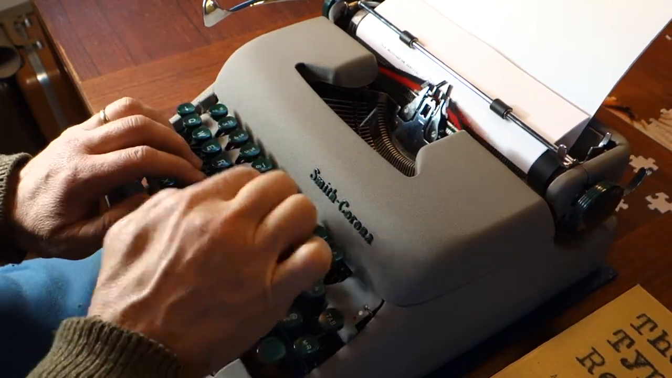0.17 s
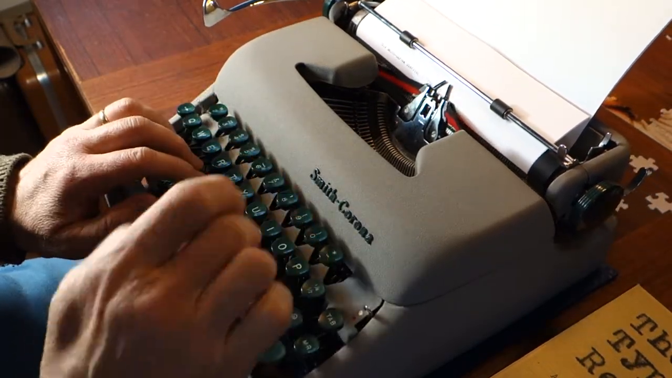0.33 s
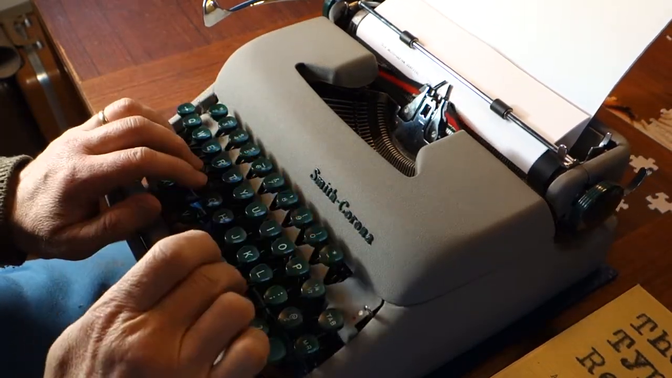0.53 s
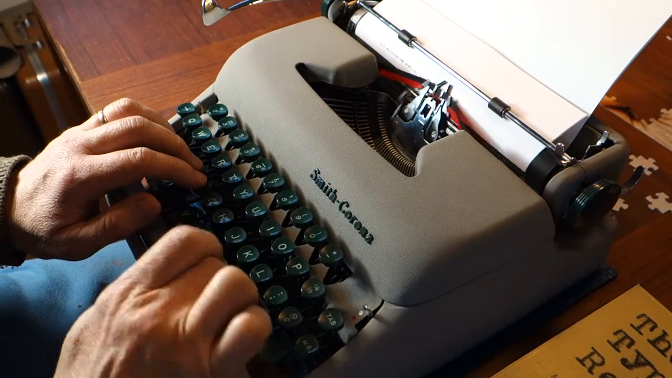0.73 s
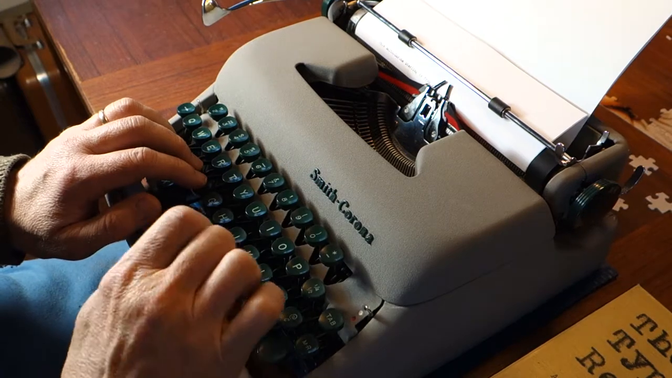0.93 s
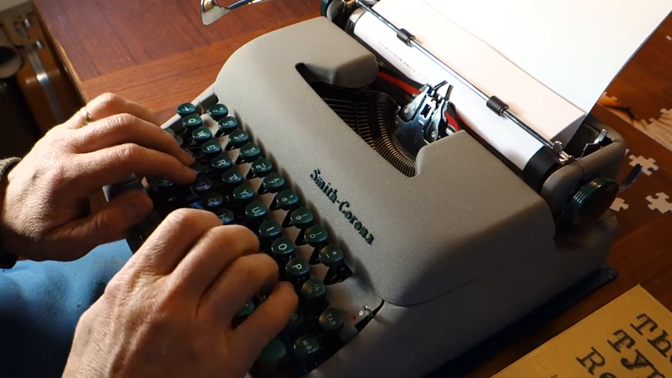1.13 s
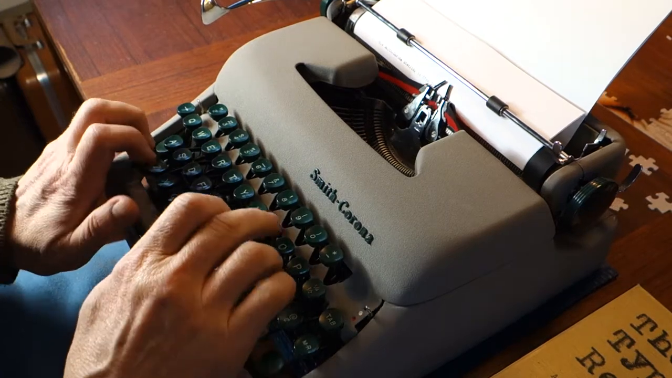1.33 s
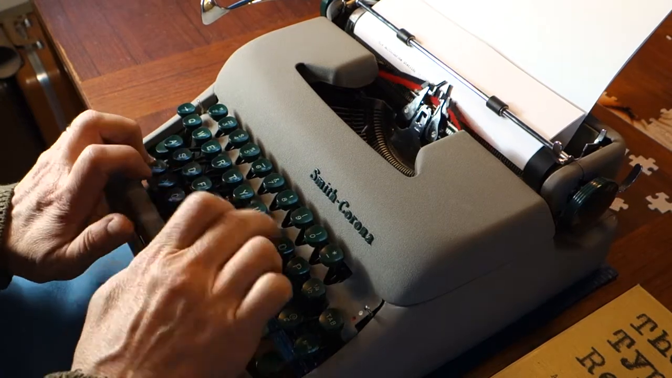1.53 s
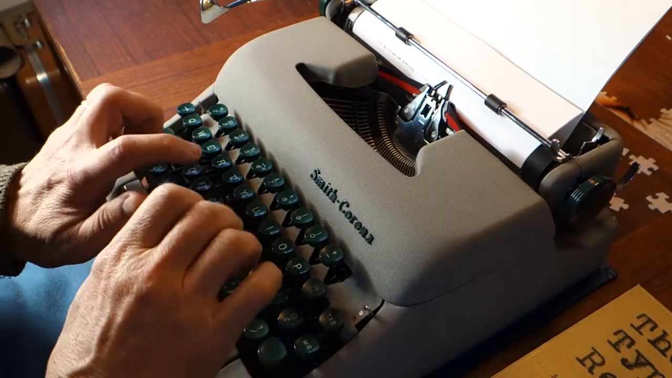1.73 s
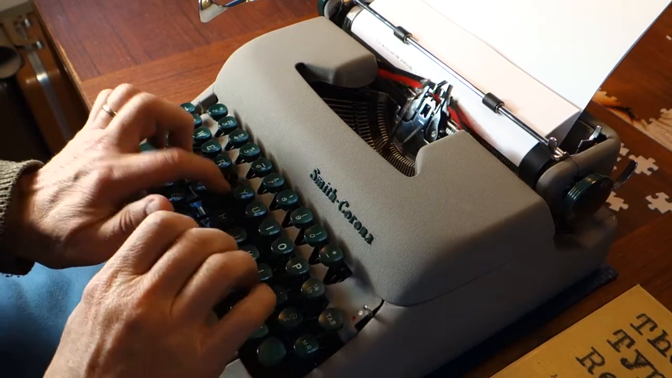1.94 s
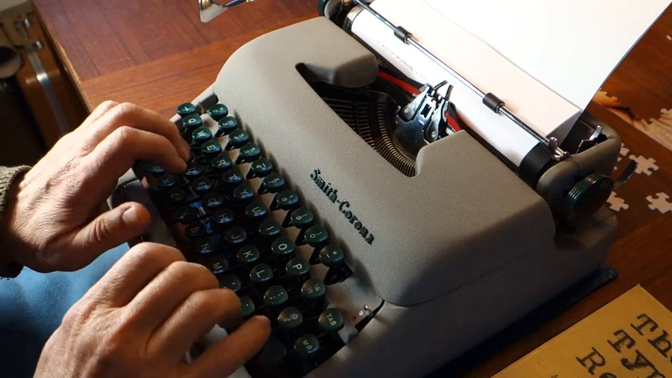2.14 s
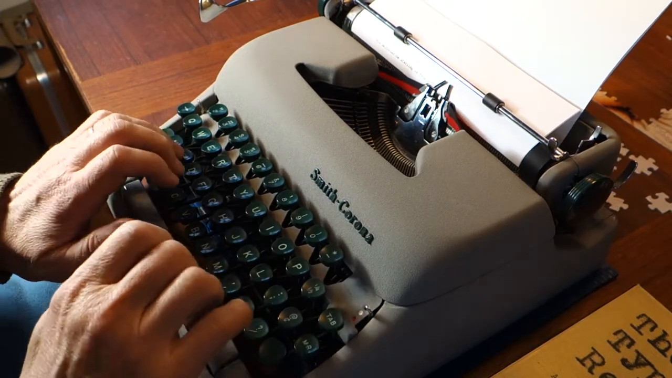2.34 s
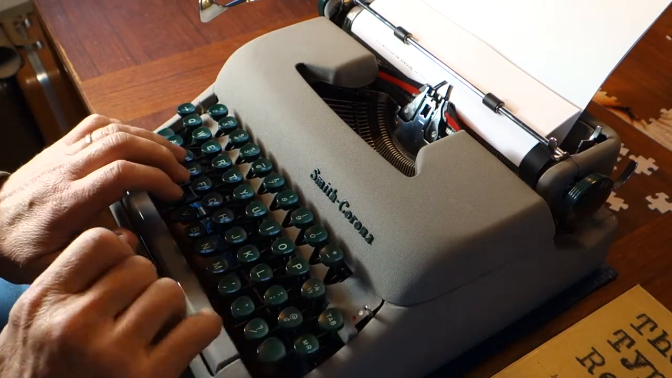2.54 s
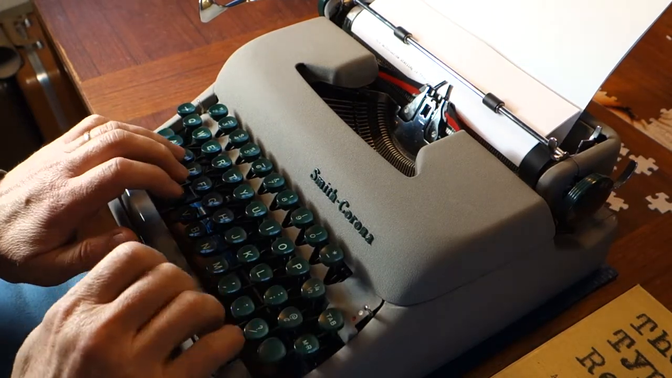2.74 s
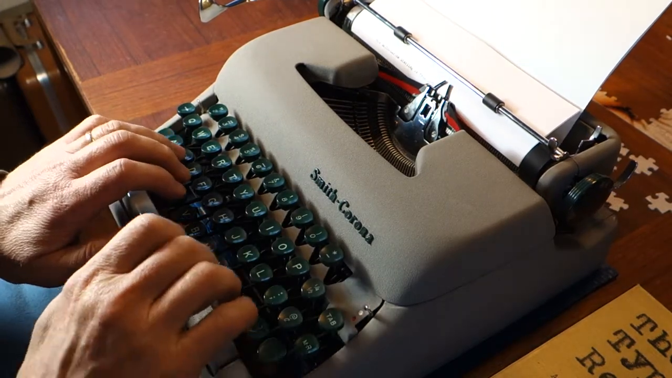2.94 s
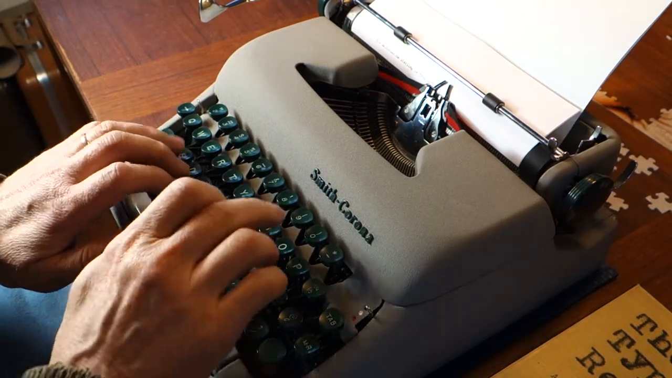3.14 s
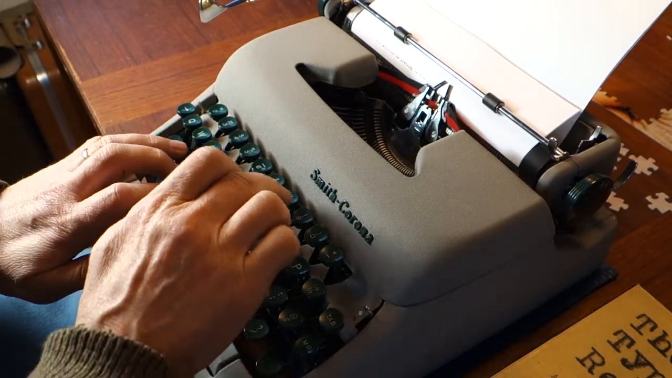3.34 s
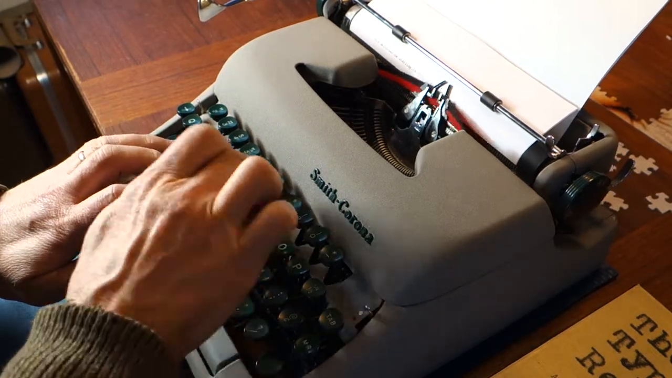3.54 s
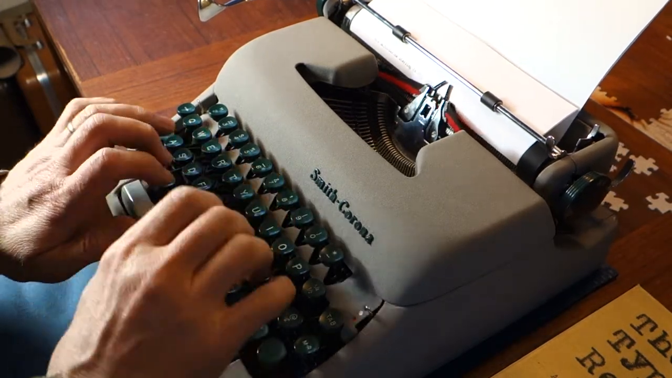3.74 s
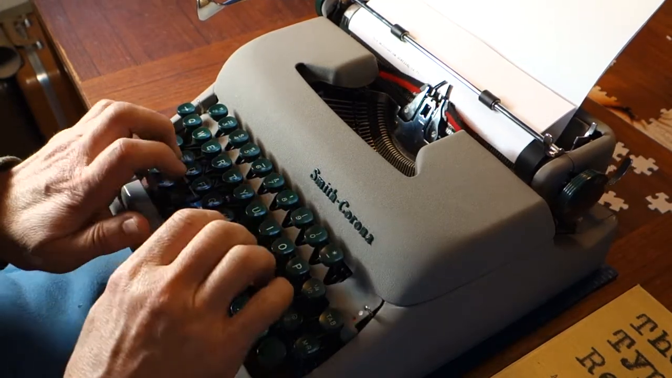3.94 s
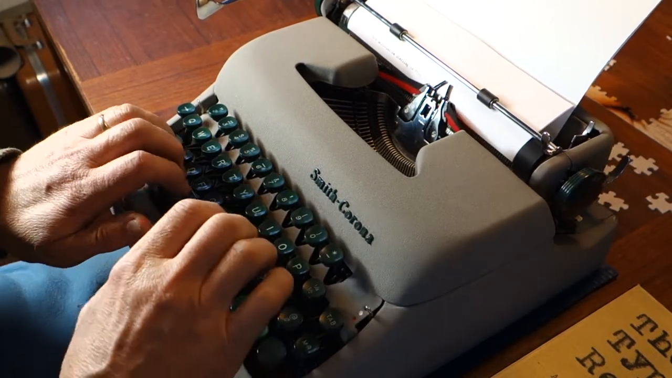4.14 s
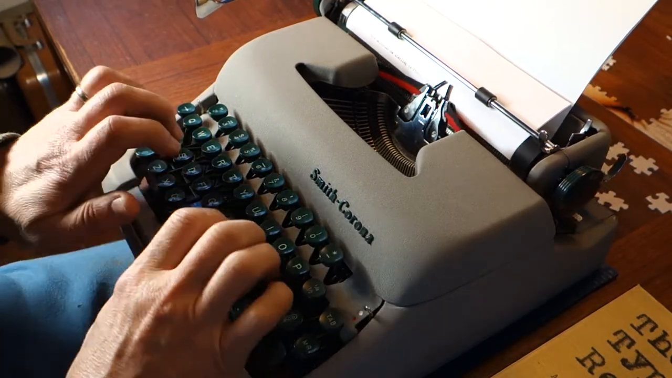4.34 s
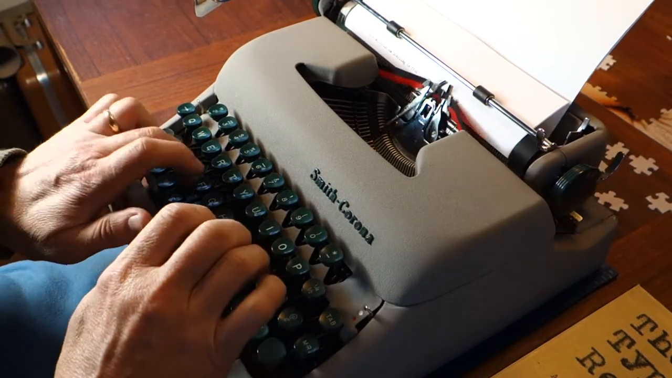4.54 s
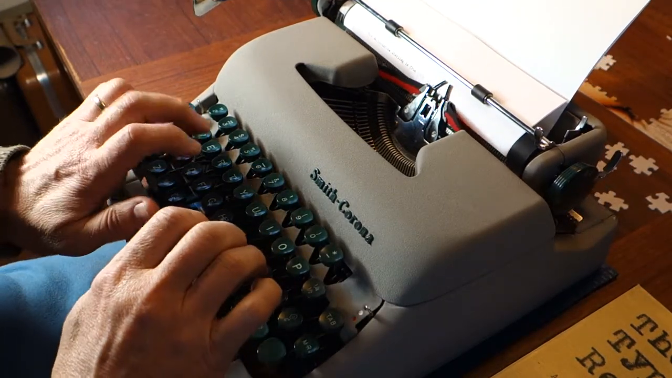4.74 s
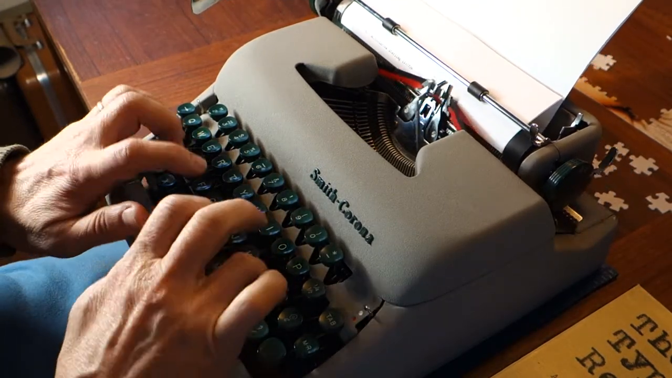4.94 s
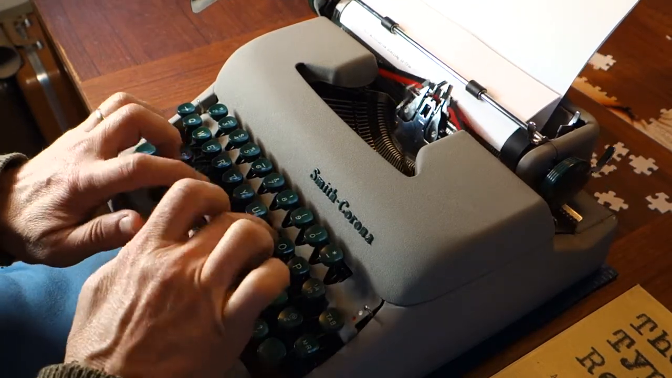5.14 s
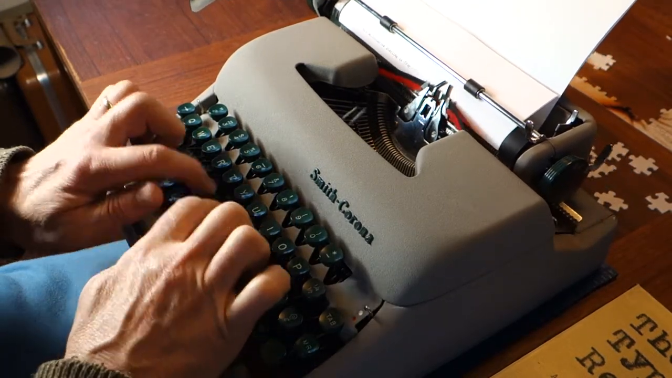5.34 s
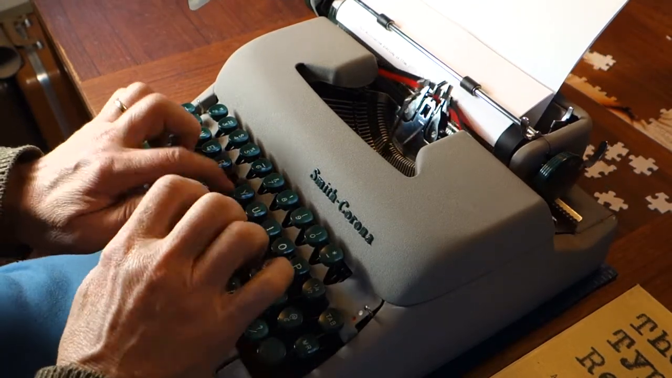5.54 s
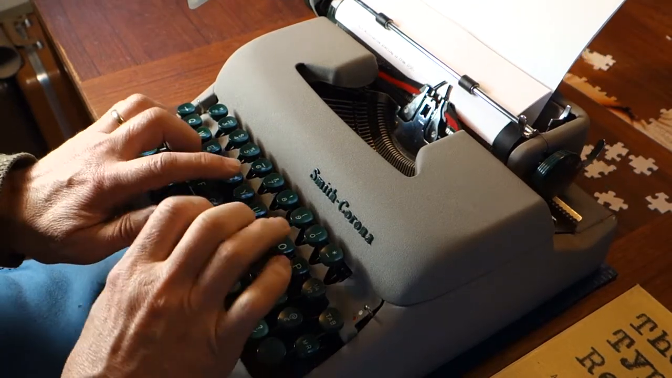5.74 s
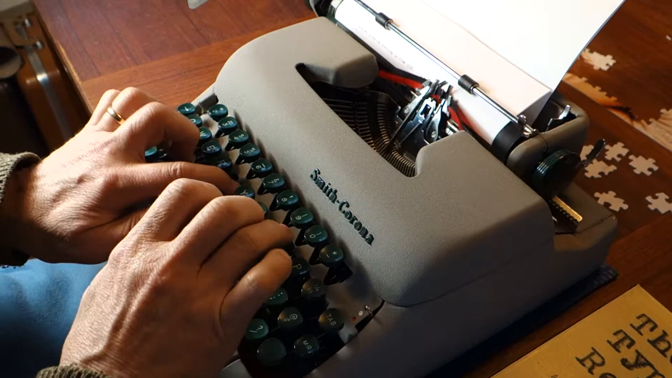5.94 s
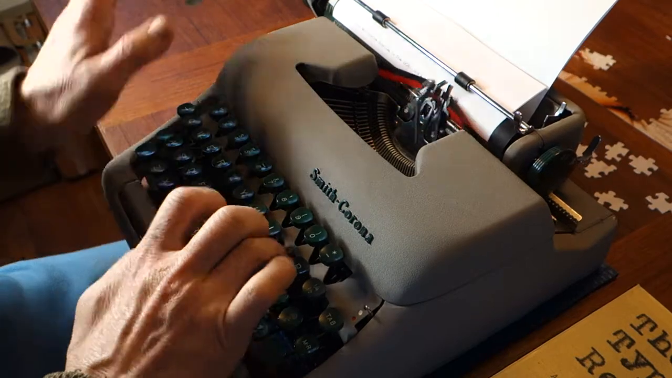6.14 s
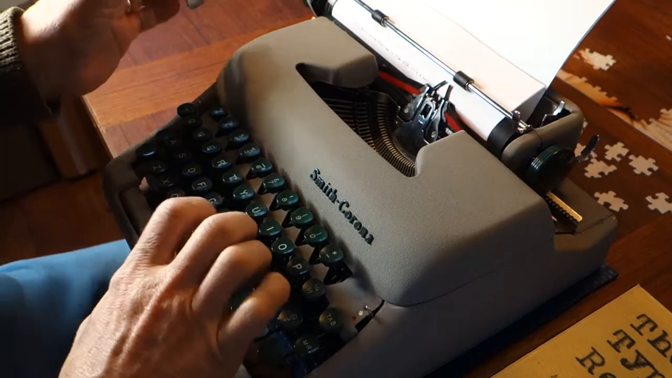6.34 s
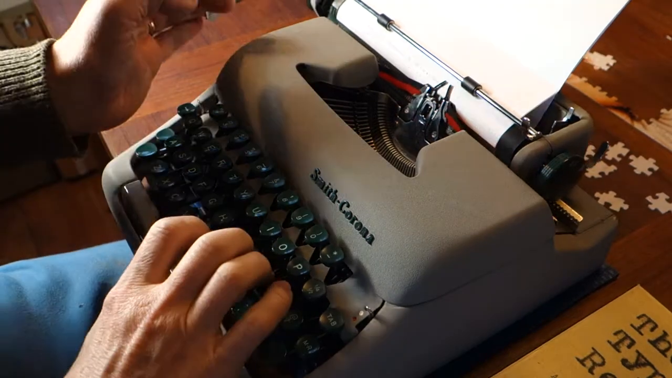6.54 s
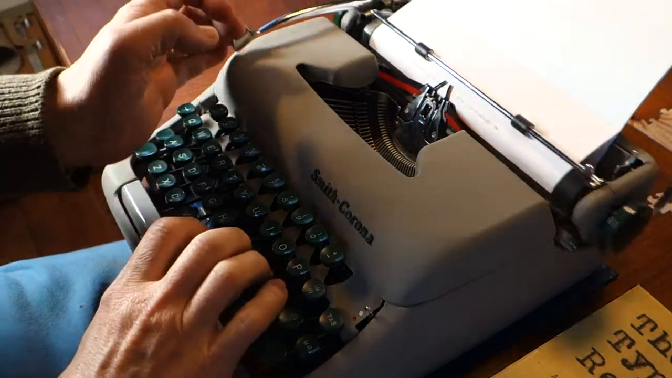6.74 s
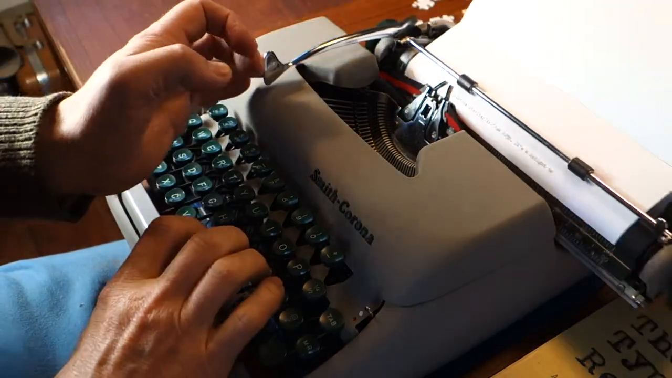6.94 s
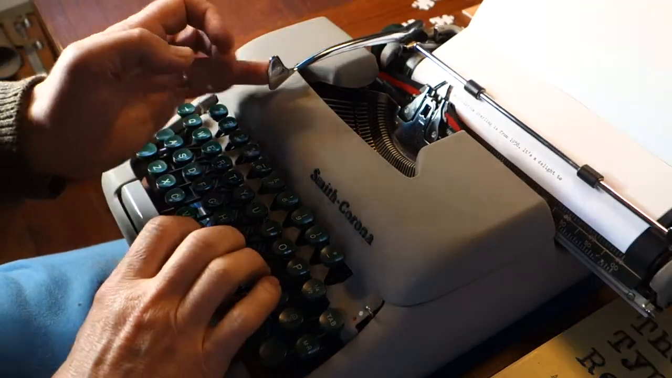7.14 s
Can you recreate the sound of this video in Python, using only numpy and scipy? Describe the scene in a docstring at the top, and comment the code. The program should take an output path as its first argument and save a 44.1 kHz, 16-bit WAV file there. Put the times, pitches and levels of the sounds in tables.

```python
"""Fast typing clatters on a small manual typewriter on a wooden table in a quiet room, then its carriage returns.
Showers of tiny clicks ring metal parts to make the rattles, and single clicks make the harder knocks.
Each letter ends in a crack and thud on the rubber platen, echoed by near surfaces; noise shakes case and table.
The carriage is a grainy rumble in surges; fading noise gives the room's echo and steady noise its quiet hiss."""
import sys
import numpy as np
from scipy import signal
from scipy.fft import rfft, irfft
from scipy.io import wavfile

SR = 44100
rng = np.random.default_rng(int(sys.argv[2]) if len(sys.argv) > 2 else 0)


def inscribe(sig):
    """Save sig as 16-bit PCM at rate SR to the path in sys.argv[1].

    A 1-D sig is mono; a 2-D sig holds one channel per row.
    Samples are clipped to [-1, 1] before scaling.
    """
    pcm = np.round(np.clip(np.atleast_2d(sig).T, -1, 1) * 32767)
    wavfile.write(sys.argv[1], SR, pcm.astype(np.int16))


N = 321930   # length in samples

# Letter keys. Each row: time the slug hits the platen in seconds, crack level in dB, thud level in dB,
# how long before that the key goes down in ms, press level in dB,
# how long after it the typebar falls back in ms, fall level in dB. Levels compare one key with another.
LETTERS = [(0.1505, -5, -15, 36.7, -32, 74, -26.5), (0.716, -13.5, -8, 37.4, -30.5, 98.4, -26.5),
           (1.589, -5, -12, 35.8, -27, 96.5, -23.5), (1.92, -2, -7.5, 37.4, -25, 106.6, -22.5),
           (3.491, -6.5, -16.5, 36.7, -30, 91, -25.5), (3.8755, -5, -7.5, 40.9, -26.5, 101, -25),
           (4.2412, -4.5, -10, 50, -36.5, 126.5, -24.5), (4.5635, -6.5, -10, 41.6, -27, 91, -26),
           (4.8352, -6, -10.5, 38.3, -27.5, 56, -40), (4.9304, -7, -8, 17, -34, 149, -24.5),
           (5.1179, -6.5, -8.5, 67, -29.5, 105.8, -24.5), (5.3059, -5.5, -9, 41.6, -28, 64, -28),
           (5.396, -7.5, -7.5, 23, -32.5, 92, -20), (5.5254, -4.5, -8.5, 39, -34.5, 106, -23),
           (5.9604, -4, -7, 37.2, -28, 108, -23.5), (6.1371, -2, -6, 42, -29, 112, -25.5)]
# Shift key. Each row: time the type basket lands in seconds, landing level in dB,
# how long before that the slack is taken up in ms, slack level in dB,
# time the key is let go in seconds, let-go level in dB. Levels are relative.
SHIFTS = [(1.3628, -15, 37, -41, 1.7444, -21.5), (3.2272, -17, 12.5, -33.5, 3.692, -21)]
# Tones of the table top. Each row: pitch in Hz, relative level in dB, time to fade by 60 dB in seconds.
TABLE_MODES = [(71.6, -10.5, 0.12), (146.5, -4.5, 0.22), (173, -7, 0.035), (277, -9, 0.012)]

SPREAD_DB = 2   # typical random change in each tone's strength from one part to the next


def from_db(db):
    """Turn a level in dB into a gain."""
    return 10 ** (np.asarray(db) / 20)


def at_hz(points, hz):
    """Read a table between its points, with frequency spaced as the ear hears it (logarithmic)."""
    points = np.array(points)
    return np.interp(np.log(hz), np.log(points[:, 0]), points[:, 1])


def band(x, low_hz, high_hz):
    """Gently keep the sound between two frequencies."""
    sos = signal.butter(1, [low_hz, high_hz], "band", fs=SR, output="sos")
    return signal.sosfilt(sos, x + 1e-18)   # the tiny offset avoids slow arithmetic in silence


def ring(x, modes, changes=(0,), vary_db=0):
    """Let a signal strike fading tones side by side; at each change time every tone gets a new strength."""
    out = 0
    part = np.searchsorted(np.sort(changes), np.arange(N) / SR)
    strengths = from_db(vary_db * rng.standard_normal((len(changes) + 1, len(modes))))
    for k, (hz, level_db, t60) in enumerate(modes):
        r = from_db(-60 / (t60 * SR))   # fading per sample
        w = 2 * np.pi * hz / SR         # turn per sample
        gain = (-1) ** k * from_db(level_db) * np.sqrt(1 - r * r)   # neighbours have opposite signs
        push = x * strengths[part, k] + 1e-18
        out = out + signal.lfilter([0, gain * np.sin(w)], [1, -2 * r * np.cos(w), r * r], push)
    return out


def stereo_noise(size, spectrum):
    """Coloured noise whose two channels are alike in the bass and differ in the treble; rms 1."""
    # How alike left and right are. Each row: frequency in Hz, likeness (1 same, 0 unrelated, -1 opposite).
    likeness = [(30, 1), (200, 0.92), (500, 0.92), (2000, 0.37), (4000, 0.0042), (8000, -0.47)]
    hz = np.maximum(np.fft.rfftfreq(size, 1 / SR), 10)
    mid, side = rfft(rng.standard_normal((2, size))) * from_db(at_hz(spectrum, hz))
    alike = np.clip(at_hz(likeness, hz), -1, 1)
    both = irfft(np.sqrt(1 + alike) * mid + np.sqrt(1 - alike) * side * [[1], [-1]], size)
    return both / np.sqrt(np.mean(both ** 2))


def bursts(starts, levels_db, lengths_ms, fall_ms, rise_ms=1.0):
    """Loudness curve of rattles: each swells, lasts for its length (60 ms at most), then dies away."""
    out = np.zeros(N)
    t = np.arange(round(.15 * SR)) / SR * 1000   # ms
    for s, level_db, length in zip(starts, levels_db, lengths_ms):
        i = round((s - rise_ms / 2000) * SR)   # the swell is centred on the start time
        rise = np.minimum(t / rise_ms, 1) ** 2
        fall = np.exp(-np.maximum(t - np.clip(length, 0, 60), 0) / fall_ms)
        out[i:i + len(t)] += (from_db(level_db) * rise * fall)[:N - i]
    return out


def chatter(per_s, spread_db):
    """A dense shower of tiny metal contacts of uneven size; rms 1."""
    sizes = from_db(spread_db * np.minimum(rng.exponential(1, N), 4)) * rng.choice([-1, 1], N)
    shower = sizes * (rng.random(N) < per_s / SR)
    return shower / np.sqrt(np.mean(shower ** 2))


def clicks(starts, levels_db):
    """One single-sample push per event."""
    out = np.zeros(N)
    out[np.round(np.asarray(starts) * SR).astype(int)] = from_db(levels_db)
    return out


def room_tone():
    """The quiet room's steady hum and hiss, made of coloured noise."""
    # Each row: frequency in Hz, relative level in dB per Hz.
    air_spectrum = [(15, -74), (25, -46), (123, -20), (216, -3), (252, -10), (399, -4.5), (758, -11),
                    (955, -11.5), (1680, -19.5), (2800, -21), (3110, -23.5), (10600, -22), (11500, -33),
                    (15000, -73), (22000, -120)]
    return from_db(-60.5) * stereo_noise(N, air_spectrum)


def contacts():
    """List the rattles and hard knocks that unfold as keys, bar and loose parts meet and let go."""
    # Typebars that touch, and the return lever. Each row: time in seconds, mid level in dB, treble level in dB.
    lone_knocks = [(5.3756, -13.5, -19), (6.3907, -26, -27), (6.4294, -17, -12), (6.438, -12, -18),
                   (6.4656, -19, -13), (6.4706, -10, -28), (6.4753, -10, -24), (7.2219, -14, -13),
                   (7.2677, -26, -29)]
    # Space bar. Each row: time it goes down in seconds, down level in dB, extra treble in dB,
    # carriage step level in dB, how long after going down it is let go in ms, let-go level in dB.
    spaces = [(1.0128, -22, -6, -31, 85, -23), (4.0323, -22.5, 1.5, -31, 71, -28),
              (4.366, -23.5, -3, -35, 71, -25.5), (5.6924, -21, 6, -33, 75.3, -25),
              (6.3086, -20, 3.5, -34, 81, -27)]
    # Loose parts, fingers on keys, return lever and carriage stop.
    # Each row: time in seconds, level in dB, extra treble in dB.
    loose_parts = [(1.48, -58.5, 18.5), (1.62, -25, -13), (3.1533, -50, 1), (3.352, -55.5, 14),
                   (3.3723, -61, 18.5), (3.684, -37, -11), (4.1835, -49, -14), (5.4226, -43, -57),
                   (6.4103, -25.5, 1.5), (6.463, -17, -13), (7.031, -21, -8), (7.191, -35.5, -1),
                   (7.2156, -17.5, -9), (7.2643, -27, -9)]
    # How each kind of contact rattles. In each, added to the contact's own level: mid in dB, treble in dB,
    # case in dB, table in dB; then how long it holds in ms.
    press_kind = (-15.5, 2, -9.5, -20.5, 6.5)
    fall_kind = (-15.5, -0.5, -12.5, -22.5, 6.5)
    space_down = (-12, -20.5, -16.5, -37.5, 10.5)
    space_step = (-15.5, -30, -5.5, -21, 12.5)
    space_up = (-15, -18, -14.5, -20.5, 7.5)
    shift_slack = (-14, -7.5, -14, -8.5, 9)
    shift_land = (-12.5, -11, -13, -12, 3.5)
    shift_up = (-13.5, -12.5, -13, -19, 24)
    loose_kind = (-10.5, -1, -11.5, -20.5, 3.5)
    # The hard knock near the start of some contacts. In each: delay in ms, then, added to the contact's level,
    # mid in dB, treble in dB, case and table in dB.
    press_knock = (3, -16, -6, -26.5)
    fall_knock = (2.5, 0, 2.5, -14)
    space_knock = (1, -8, -2, -24)
    step_knock = (2, -9.5, -15, -17)
    land_knock = (2, 0.5, -34, -1.5)
    up_knock = (2, -8, -1.5, -6)
    press_hold = 0.4   # share of the key's way down added to its rattle
    step_ms = 37       # the carriage moves on one place this long after the bar goes down
    frame_db = -27.5   # what lone knocks pass on to case and table, relative to their mid level

    rattles = []
    blows = [(s, mid_db, treble_db, mid_db + frame_db) for s, mid_db, treble_db in lone_knocks]

    def add(s, db, kind, knock=None, bright_db=0, hold_ms=0):
        """Add one contact; case and table get half of its extra treble gain in dB."""
        mid, treble, case, table, ms = kind
        body_db = db + bright_db / 2
        rattles.append((s, db + mid, db + treble + bright_db, body_db + case, body_db + table, ms + hold_ms))
        if knock:
            late_ms, knock_mid, knock_treble, knock_frame = knock
            blows.append((s + late_ms / 1000, db + knock_mid, db + knock_treble, db + knock_frame))

    for s, _, _, down_ms, press_db, back_ms, fall_db in LETTERS:
        add(s - down_ms / 1000, press_db, press_kind, press_knock, hold_ms=press_hold * down_ms)
        add(s + back_ms / 1000, fall_db, fall_kind, fall_knock)
    for s, db, bright_db, step_db, up_ms, up_db in spaces:
        add(s, db, space_down, space_knock, bright_db)
        add(s + step_ms / 1000, step_db, space_step, step_knock)
        add(s + up_ms / 1000, up_db, space_up, step_knock, bright_db)
    for s, db, slack_ms, slack_db, up_s, up_db in SHIFTS:
        add(s - slack_ms / 1000, slack_db, shift_slack, hold_ms=slack_ms)
        add(s, db, shift_land, land_knock)
        add(up_s, up_db, shift_up, up_knock)
    for s, db, bright_db in loose_parts:
        add(s, db, loose_kind, bright_db=bright_db)
    return np.transpose(rattles), np.transpose(blows)


def linkages():
    """Loose metal rattles as showers of contacts ring it, while bursts of noise shake the case and table."""
    # Levers and typebars. Each row: pitch in Hz, relative level in dB, time to fade by 60 dB in seconds.
    metal_modes = [(1196, -10, 0.002), (1720, -26, 0.029), (2340, -2, 0.019), (2357, 6, 0.11),
                   (3630, -51, 0.031), (4520, -16, 0.028), (5200, -9, .012), (6090, 6.5, 0.0021),
                   (6980, -61, 0.03), (8840, -54, 0.0109), (9350, 7.5, 0.0028)]
    # Sheet-metal case. Each row: pitch in Hz, relative level in dB, time to fade by 60 dB in seconds.
    case_modes = [(362, -5.5, 0.044), (465, -6.5, 0.059), (542.5, 1, 0.12), (666.7, -0.5, 0.066),
                  (780, -8.5, 0.051), (1028, -4.5, 0.014)]
    guide_db, escapement_db, shake_db = -33.5, -31.5, -40   # relative levels at each letter
    escape_s = .004   # the escapement lets go this long after a strike

    s, mid_db, treble_db, case_db, table_db, ms = contacts()[0]
    hit, press_db = np.transpose(LETTERS)[[0, 4]]
    ones = np.ones(len(hit))
    parts = np.append(s, hit - .012) - .003   # tone strengths change just before each rattle

    # The typebar enters its guide just before the strike, louder for a harder press.
    guide_levels = guide_db + press_db - press_db.mean()
    guide = bursts(hit - .010, guide_levels, 9 * ones, fall_ms=.8, rise_ms=4)
    escapement = bursts(hit + escape_s, escapement_db * ones, 22.4 * ones, fall_ms=29.4, rise_ms=1.4)
    typing = guide + escapement
    mid_curve = bursts(s, mid_db, ms, fall_ms=25.4, rise_ms=4.1) + typing
    high_curve = bursts(s, treble_db, ms, fall_ms=14.6, rise_ms=4.6) + from_db(5.5) * typing
    mids = chatter(12000.0, spread_db=2.0) * mid_curve
    highs = chatter(15000.0, spread_db=6.5) * high_curve

    low_modes = [m for m in metal_modes if m[0] < 4000]
    high_modes = [m for m in metal_modes if m[0] >= 4000]
    metal = from_db(-16.5) * ring(mids, low_modes, parts, SPREAD_DB)
    metal += from_db(5.5) * band(mids, 820, 3610)
    metal += from_db(-26.5) * ring(highs, high_modes, parts, SPREAD_DB)
    metal += from_db(-2.0) * band(highs, 4270, 11600)

    shaking = bursts(s, case_db, ms, fall_ms=13.3)
    shaking += bursts(hit - .005, shake_db * ones, 60 * ones, fall_ms=38.0)
    shaken = rng.standard_normal(N) * shaking
    case = from_db(-5) * ring(shaken, case_modes, parts, SPREAD_DB)
    case += from_db(6.5) * band(band(shaken, 346, 710), 346, 710)

    thumps = bursts(s, table_db, ms, fall_ms=9.5)
    thumps += bursts(hit, (shake_db - 15) * ones, 7.56 * ones, fall_ms=7.8)
    table = from_db(-2.5) * ring(rng.standard_normal(N) * thumps, TABLE_MODES)
    return metal + case + table


def knocks():
    """Solid parts meet: a click starts a short hard ring and a dull blow into the frame."""
    s, mid_db, treble_db, frame_db = contacts()[1]
    # Each tone below: pitch in Hz, relative level in dB, time to fade by 60 dB in seconds.
    mids = ring(clicks(s, mid_db), [(2405, 4.6, 0.015), (3440, 0, 0.0046), (1750, -11.0, 0.0096)])
    blow = ring(clicks(s, frame_db), [(443, -2.0, 0.0083), (221, -3.0, 0.0056), (151, -10.5, 0.055)])
    treble = ring(clicks(s, treble_db), [(9140, -1.0, 0.0032), (6300, -2.5, 0.008)])
    return from_db(3.0) * mids + from_db(20.0) * blow + from_db(4.0) * treble


def strikes():
    """Steel slugs crack on the paper, the rubber platen thuds, the typebar rings and near surfaces echo it."""
    # Struck typebar and basket. Each row: pitch in Hz, relative level in dB, time to fade by 60 dB in seconds.
    typebar_modes = [(2030, -6, 0.032), (2550, -5, 0.11), (6280, 3, 0.02), (8800, -4.5, 0.04)]
    # Near surfaces. Each row: delay in ms, level in dB, low edge of the echo in Hz.
    near_echoes = [(5.8, 0, 4000), (14.6, -7, 3000)]
    slug_modes = [(8700, 6, .002), (6000, 0, .0025)]   # Hz, dB, seconds to fade by 60 dB
    echo_boost_db = 2   # extra crack level sent to the surfaces
    rebound_s = .006    # the typebar rings once it leaves the paper

    s, crack_db, thud_db = np.transpose(LETTERS)[:3]
    crack = ring(clicks(s, crack_db), slug_modes)
    bounced = ring(clicks(s, crack_db + echo_boost_db), slug_modes)
    thud = band(ring(clicks(s + .0006, thud_db), [(2800, 14, .003)]), 1900, 16600)
    rebound = ring(clicks(s + rebound_s, crack_db), typebar_modes, s - .002, SPREAD_DB)
    thud = thud + from_db(2.0) * rebound

    # The crack leans right, the thud and typebar lean left.
    out = crack * from_db([[-1.5], [1.5]]) + thud * from_db([[.7], [-.7]])
    for k, (ms, level_db, low_hz) in enumerate(near_echoes):
        echo = from_db(level_db) * band(bounced + from_db(-17.0) * thud, low_hz, 15000)
        for ear in range(2):
            lag = round(ms / 1000 * SR) + 2 * ear * (-1) ** k   # the right ear is two samples late or early
            out[ear, lag:] += echo[:-lag]
    return crack + thud, out


def feet():
    """The machine settles after a heavy shift, pushing softly through its rubber feet into the table."""
    s, db, _, _, up_s, up_db = np.transpose(SHIFTS)
    settle_s = .065   # delay after the basket lands or the key is let go
    pushes = clicks(s + settle_s, db + 6) + clicks(up_s + settle_s, up_db + 4)
    return ring(band(pushes, 60.0, 200.0), TABLE_MODES)


def carriage():
    """Rollers and rack teeth make a grainy rumble, in surges, as the carriage is pushed along its rails."""
    # Surges of the push. Each row: time in seconds, rolling level in dB.
    slide = [(6.49, -65), (6.546, -46.5), (6.64, -42), (6.685, -34), (6.725, -43), (6.754, -31.5),
             (6.808, -43), (6.844, -33), (6.896, -43), (6.944, -35), (7.016, -52), (7.035, -38.5),
             (7.1, -71)]
    # Colour of the rolling. Each row: frequency in Hz, relative level in dB per Hz.
    rail_spectrum = [(120, -65), (200, -20), (538, 2.5), (791, -1), (1180, 15), (1350, 1.5), (2130, 5),
                     (3020, -10), (4680, -11.5), (11000, -26), (14300, -62), (22000, -120)]
    # Rack teeth and rollers. Each row: pitch in Hz, relative level in dB, time to fade by 60 dB in seconds.
    rack_modes = [(533, -1.5, 0.062), (720, -4, 0.047), (855, -7, 0.09), (1155, -7.5, 0.046),
                  (1420, -3, 0.013), (3450, -6, 0.012), (4590, -3.5, 0.012)]
    bright_db, bright_follows = -28, 0.92   # treble level at the mean push, and its share of each surge
    teeth_db = -3.5   # rack teeth in the rumble

    s, level_db = np.transpose(slide)
    t = np.arange(N) / SR
    level = np.interp(t, s, level_db)
    moving = (t > s[0]) & (t < s[-1])
    bright = bright_db + bright_follows * (level - level_db.mean())

    hz = np.maximum(np.fft.rfftfreq(N, 1 / SR), 10)
    grains = irfft(rfft(chatter(per_s=3500.0, spread_db=1.5)) * from_db(at_hz(rail_spectrum, hz)), N)
    grains /= grains.std()
    top = signal.sosfilt(signal.butter(2, 4000, "high", fs=SR, output="sos"), grains)
    teeth = ring(chatter(per_s=700.0, spread_db=3.0), rack_modes, np.arange(6.5, 7.1, .03), vary_db=4)
    rolling = grains - top + from_db(teeth_db) * teeth
    return band(moving * (from_db(level) * rolling + from_db(bright) * top), 320.0, 19000)


def tail():
    """One room echo: stereo noise cut into octaves, each dying away at its own rate."""
    # How fast the room falls silent. Each row: frequency in Hz, time to fade by 60 dB in seconds.
    room_t60 = [(100, 0.62), (300, 0.48), (1000, 0.42), (4000, 0.36), (11000, 0.31)]
    size = round(.6 * SR)
    t = np.arange(size) / SR
    noise = stereo_noise(size, [(20, 0), (20000, 0)])   # equal level at all frequencies
    out = 0
    for low in 40 * 2. ** np.arange(9):
        octave = signal.sosfilt(signal.butter(2, [low, 2 * low], "band", fs=SR, output="sos"), noise)
        out = out + octave * from_db(-60 * t / at_hz(room_t60, low * np.sqrt(2)))
    out = out * np.clip((t - .002) / 0.0013, 0, 1)   # builds up over the first reflections
    return out / np.sqrt(np.mean(np.sum(out ** 2, axis=1)))


def room(x, count=5):
    """Successive sounds come from different parts of the machine, so they take different paths in the room."""
    turn = np.arange(N) / SR / .04   # a new path every 40 ms, blended with the one before
    out = 0
    for k in range(count):
        share = np.clip(1 - np.abs((turn - k + count / 2) % count - count / 2), 0, 1)
        out = out + signal.fftconvolve((x * share)[None], tail(), axes=1)[:, :N]
    return out


def scene():
    """Add up the machine close to the microphone pair, its echo in the room, and the room tone."""
    strike, strike_with_echoes = strikes()
    works = linkages() + knocks() + feet() + carriage()
    # The machine's sound is thinned below about 110 Hz.
    works = signal.sosfilt(signal.butter(2, 110, "high", fs=SR, output="sos"), works)
    near = works * from_db([[-.3], [.3]]) + strike_with_echoes
    wet = from_db(-1.5) * room(works + from_db(-0.5) * strike)
    return near + wet + room_tone()


def record(dry):
    """The top treble drops in a step above 11 kHz, then is cut away towards 13.6 kHz."""
    step = signal.ellip(8, .5, 30, 11030, fs=SR, output="sos")
    x = signal.sosfilt(step, dry)
    return signal.sosfilt(signal.cheby2(14, 75, 13600, fs=SR, output="sos"), x)


dry = scene()
out = record(dry)
inscribe(out)
```